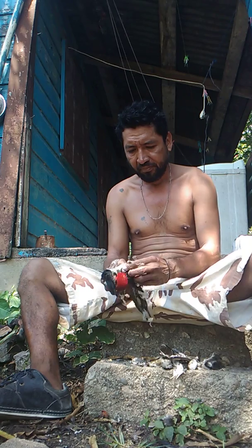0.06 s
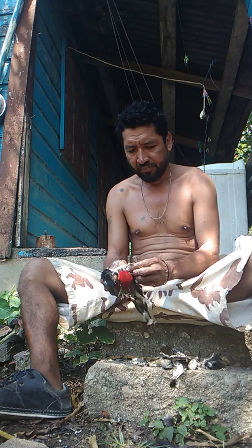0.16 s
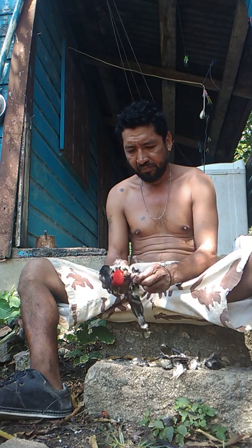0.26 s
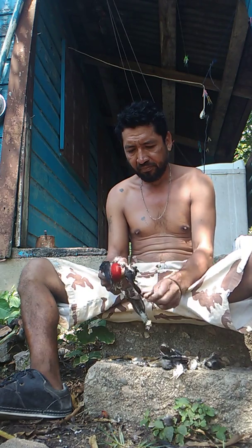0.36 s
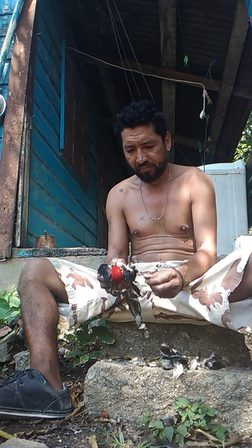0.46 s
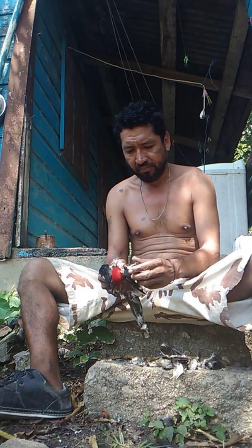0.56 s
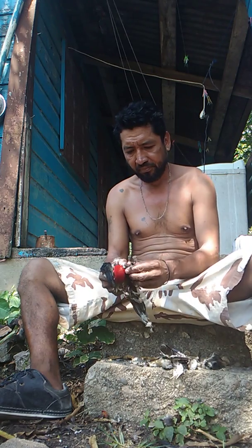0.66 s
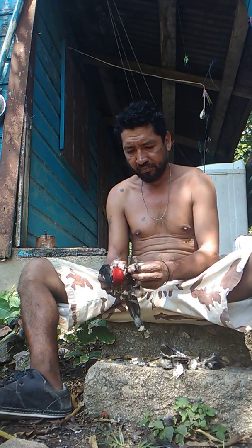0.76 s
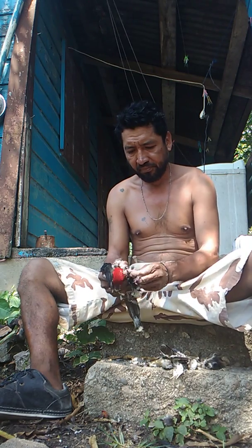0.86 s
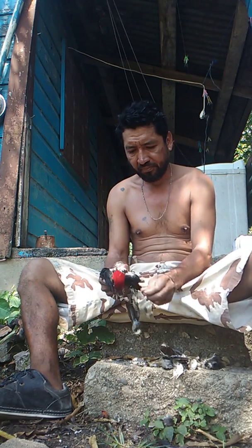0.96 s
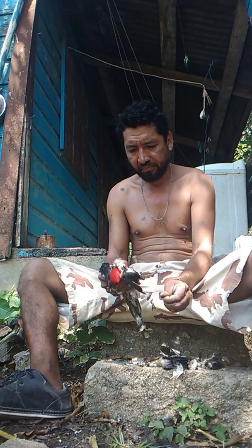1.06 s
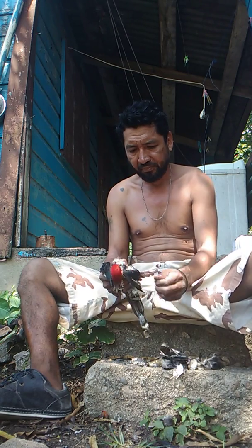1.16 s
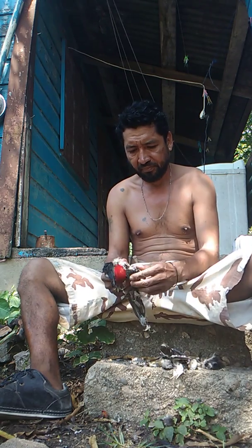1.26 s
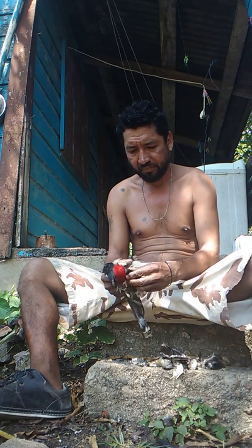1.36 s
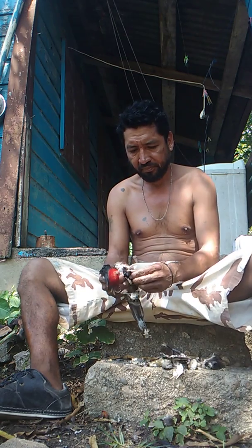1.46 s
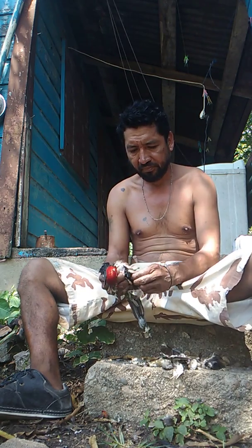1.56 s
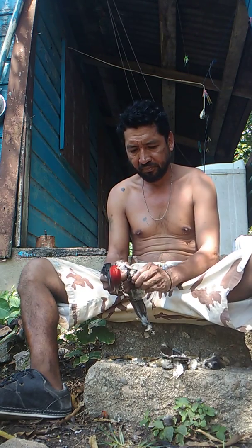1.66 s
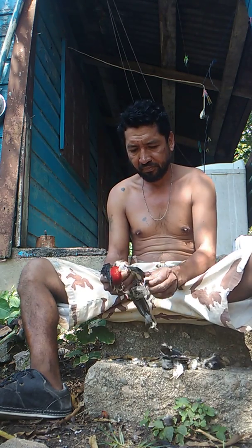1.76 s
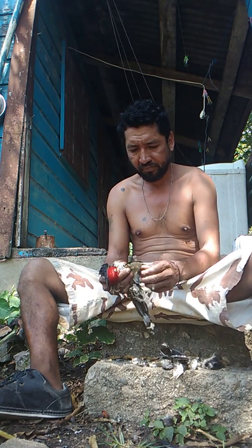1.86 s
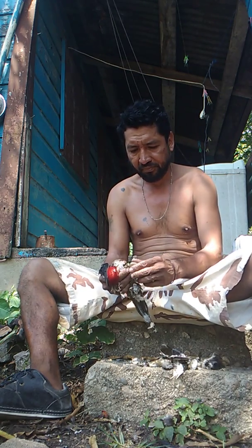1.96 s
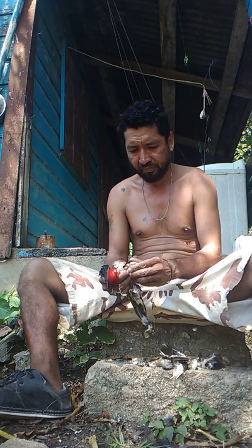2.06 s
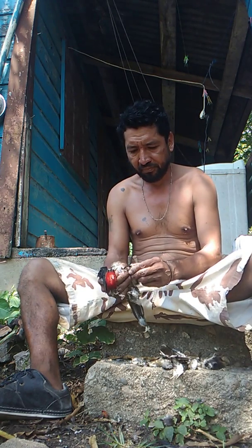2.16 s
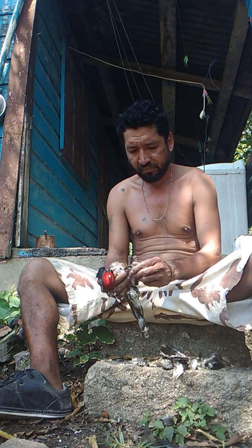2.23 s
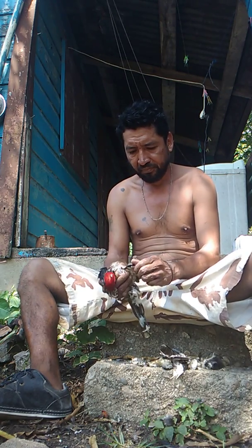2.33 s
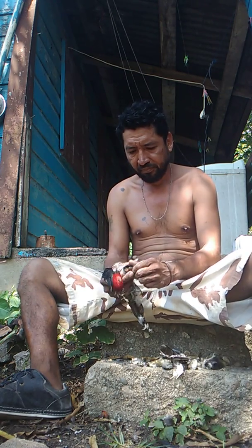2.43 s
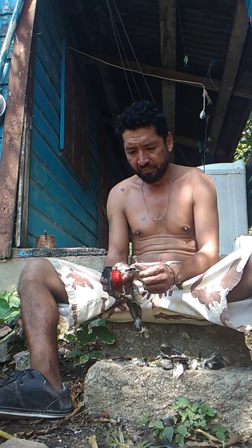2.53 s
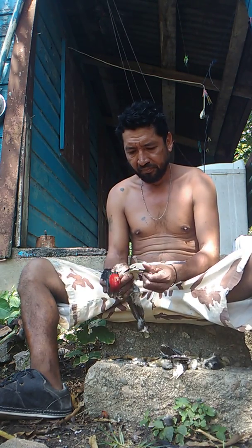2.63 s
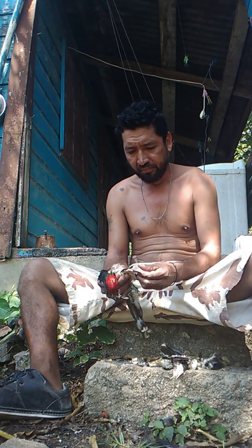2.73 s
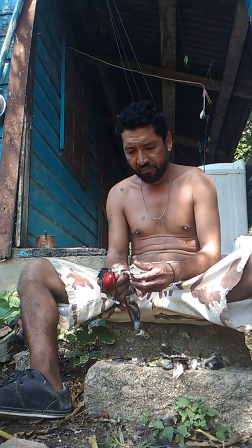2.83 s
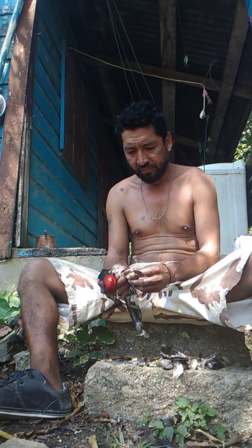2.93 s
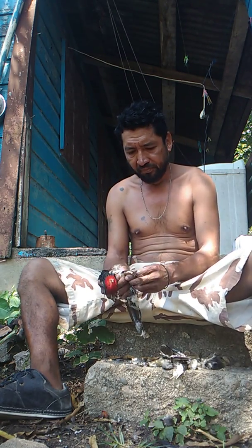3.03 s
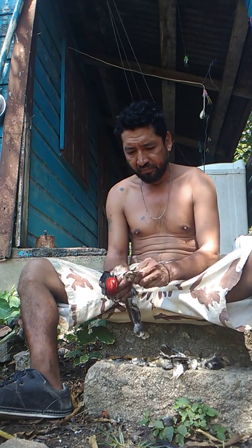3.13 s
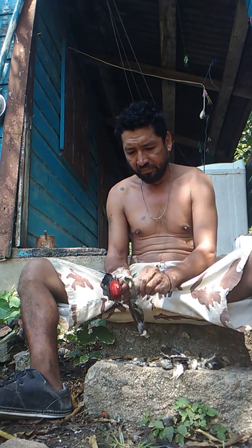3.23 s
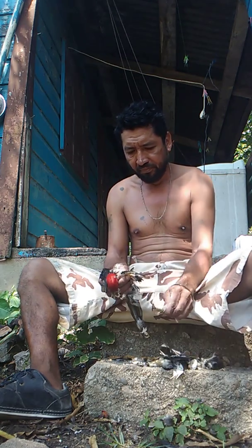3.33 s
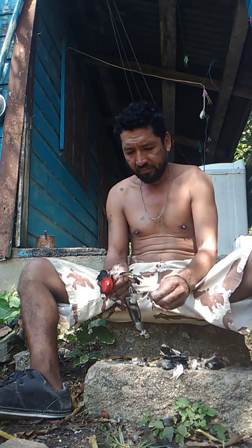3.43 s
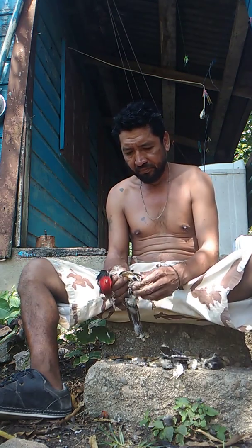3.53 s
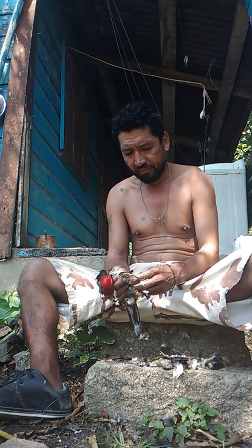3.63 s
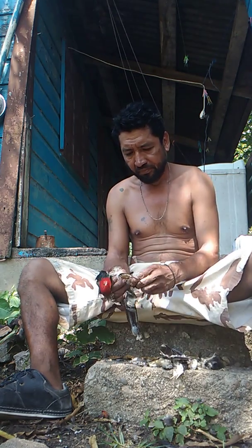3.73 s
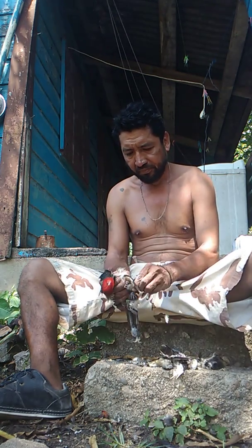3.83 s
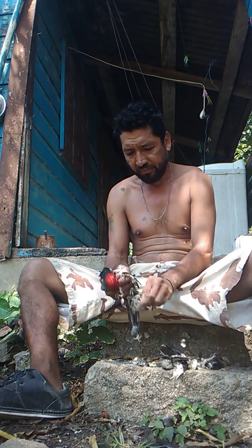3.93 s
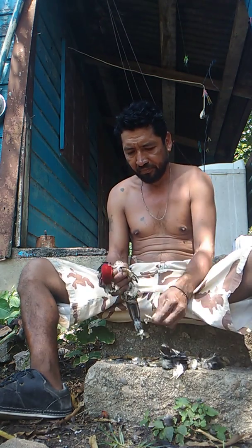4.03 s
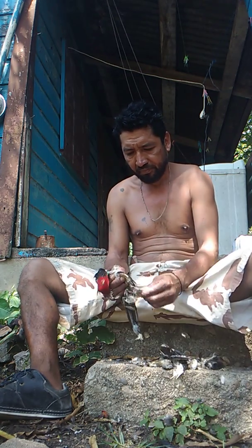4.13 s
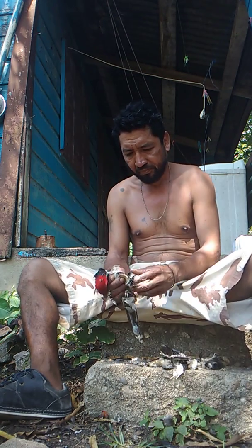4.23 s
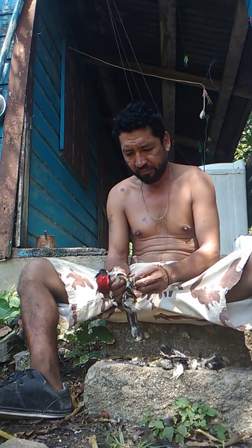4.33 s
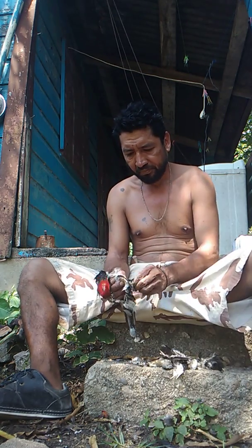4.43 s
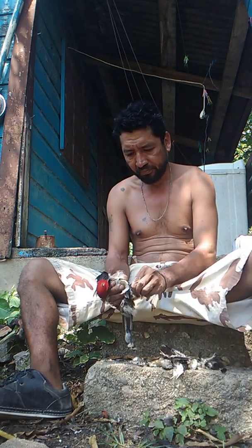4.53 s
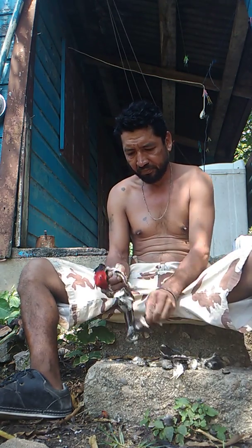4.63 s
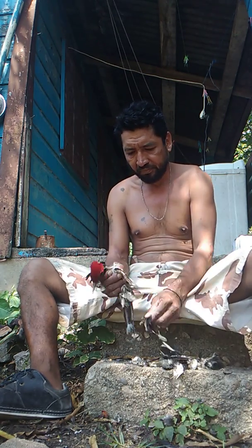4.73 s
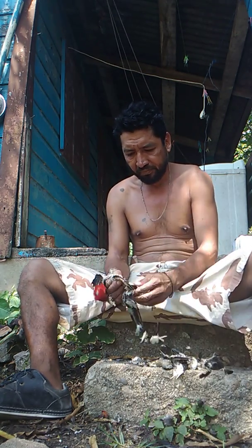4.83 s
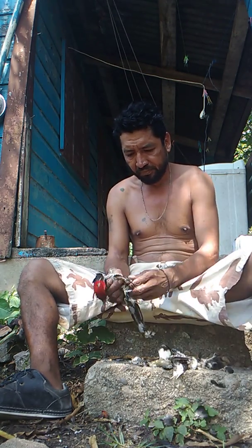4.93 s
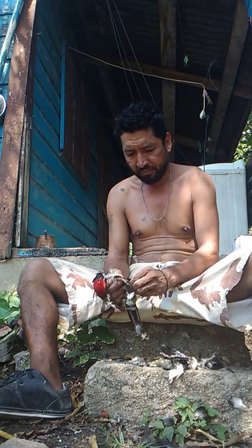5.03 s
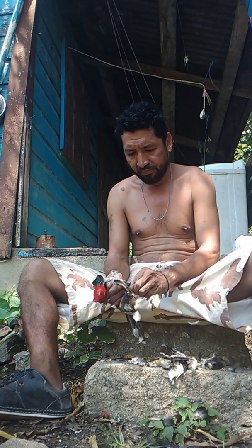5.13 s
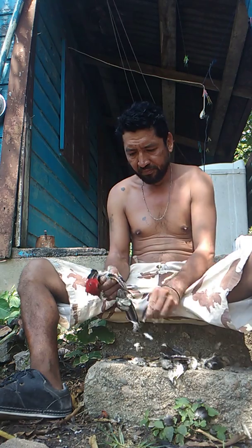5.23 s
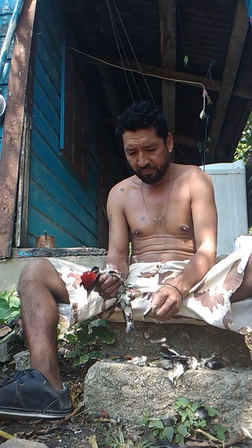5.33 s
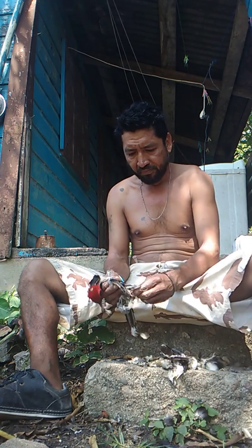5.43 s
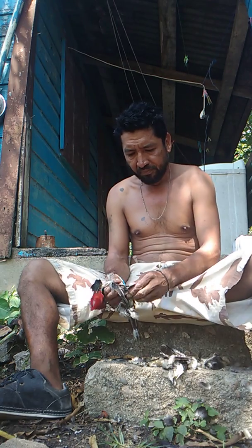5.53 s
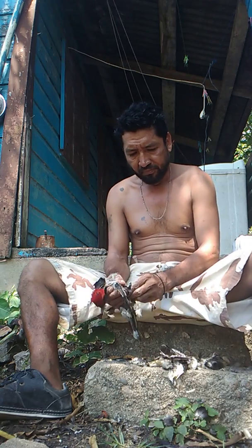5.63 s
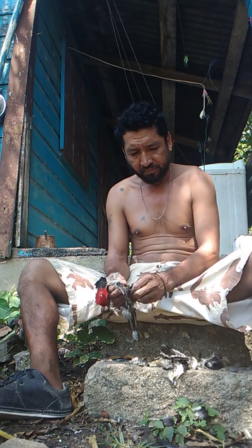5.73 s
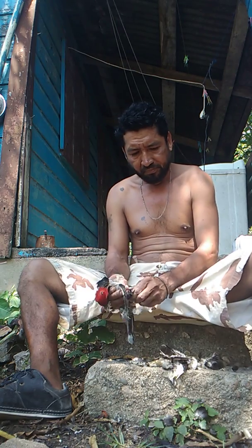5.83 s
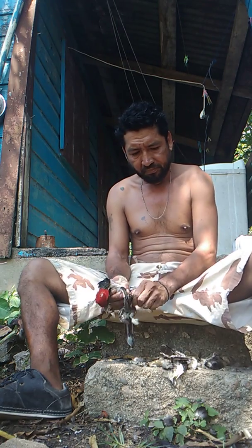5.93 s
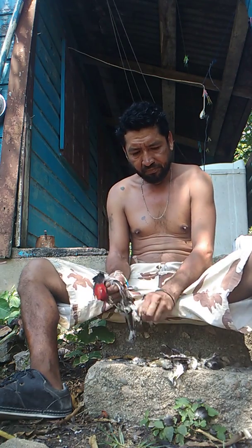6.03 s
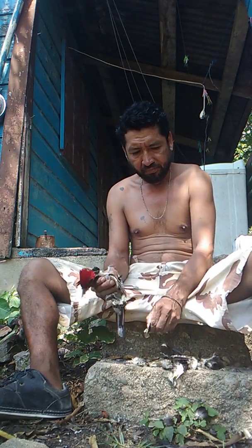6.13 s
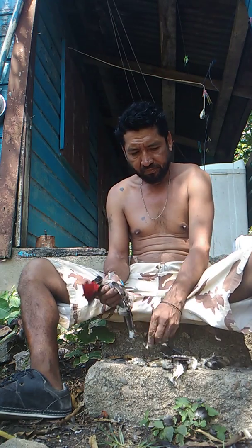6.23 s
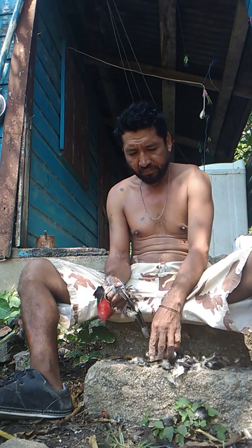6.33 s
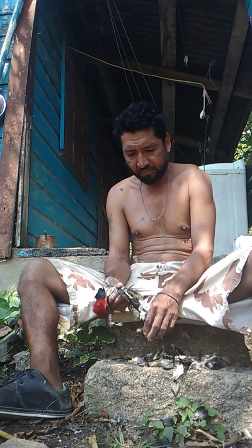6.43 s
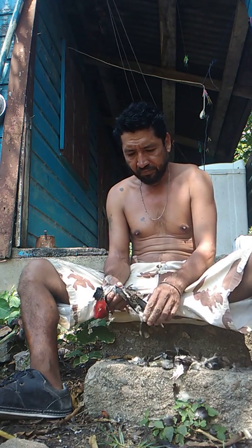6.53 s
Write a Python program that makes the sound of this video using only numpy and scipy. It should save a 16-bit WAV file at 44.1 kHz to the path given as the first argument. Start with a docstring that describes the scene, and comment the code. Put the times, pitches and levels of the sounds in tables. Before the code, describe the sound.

Dry feathers hiss under moving fingers, broken by tiny high ticks and irregular clusters of crisp quill snaps, each with a slight woody wing knock. A firm brush swells before three seconds; a small bump and thin creak precede one pull after four and a half. Outdoors under a porch roof, close stereo phone pickup, hands to the left, wind rumble to the right, quiet air and remote animal calls behind.

```python
"""Plucking a bird on a porch

Someone on a porch step plucks a dead bird by hand, close to a phone with a left and a right microphone port.
Quills tear out in bursts of tiny noise snaps that ring the wing and echo under the roof.
Streams of random slips make the rustle of fingers in the plumage; gliding tones make squeaks and a creak.
Behind are a scuff, a few distant animal calls, wind noise at each port, outdoor air and a far engine's hum."""
import sys
import numpy as np
from scipy import signal
from scipy.fft import rfft, irfft, next_fast_len
from scipy.io import wavfile
from scipy.ndimage import uniform_filter1d, map_coordinates

SR = 44100
rng = np.random.default_rng(int(sys.argv[2]) if len(sys.argv) > 2 else 0)


def log_audio(samples):
    """Write samples as a 16-bit WAV file to the path given in sys.argv[1]."""
    # one column per channel
    frames = np.atleast_2d(samples).T
    # limit to full scale, then quantise
    limited = np.clip(frames, -1, 1)
    pcm = np.round(limited * 32767).astype(np.int16)
    wavfile.write(sys.argv[1], SR, pcm)


N = 290218
T = np.arange(N) / SR  # s

# Levels in the tables are relative; the functions trim them. Spectra give a shape only.

# Quills snapping out of the skin. Each row: start in seconds, level in dB, wing knock in dB against that,
# left minus right in dB, brightness in dB per octave.
SNAPS = [(1.0108, -27, -17, 13, 0), (1.0123, -22, -15, 13, 2), (1.0143, -26, -22, 11, -2),
         (1.0241, -27, -18, 8, -14), (1.0345, -21, -18, 10, -4), (1.0358, -27, -15, 8, -3),
         (1.0378, -28, -15, 6, -5), (1.0423, -29, -22, 10, -6), (1.0489, -32, -12, 13, -9),
         (1.0652, -37, -22, 14, -3), (1.0872, -35, -24, 11, -9), (3.2716, -31, -16, 14, 3),
         (3.2795, -19, -16, 12, -7), (3.2816, -25, -18, 10, -4), (3.2865, -23, -19, 13, -4),
         (3.288, -19, -26, 16, 0), (3.2919, -25, -26, 17, 2), (3.3073, -25, -19, 8, 4),
         (3.3093, -18, -17, 11, -6), (3.3152, -31, -9, 7, 0), (3.3205, -30, -14, 10, 4),
         (3.3239, -22.5, -22, 8, 3), (3.3275, -27, -13, 8, -13), (3.9497, -29, -26, 20, 3),
         (3.9592, -30, -19, 22, 2), (3.9658, -28, -28, 17, 2), (3.9709, -30, -18, 12, 8),
         (3.9766, -10.5, -30, 15, 2), (3.9775, -16, -28, 15, 0), (3.9786, -19, -24, 14, 0),
         (3.9805, -20, -16, 12, 0), (3.9815, -18, -12, 11, 2), (3.9836, -23, -12, 12, -2),
         (4.6304, -22.5, -40, 24, 14), (4.6314, -28, -34, 22, 10), (4.6448, -30, -32, 26, 10),
         (4.6495, -26, -37, 14, 2), (4.6516, -27, -37, 10, -3), (4.6526, -28, -37, 9, -2),
         (4.6563, -32, -30, 10, 0), (5.239, -32, -36, 16, 9), (5.245, -16.3, -44, 15, 3.5),
         (5.2473, -27, -38, 6, 0), (5.2816, -39, -28, 10, -10), (6.0593, -22.5, -28, 14, 1),
         (6.0613, -25, -20, 15, -4), (6.0679, -28, -24, 19, 4), (6.1015, -37, -28, 10, -5),
         (6.3926, -36, -20, 7, 3), (6.3938, -30, -22, 11, 2), (6.3958, -35, -22, 9, -4)]
# Tugs in which small barbs and lesser quills tear. Each row: start in seconds, length in seconds, level in dB,
# wing knock in dB against that.
TUGS = [(1.01, .007, -39, -15), (1.024, .003, -40, -20), (1.035, .011, -34, -15), (1.047, .022, -44, -9),
        (3.271, .003, -42, -14), (3.2795, .012, -33.5, -11), (3.292, .014, -42, -8),
        (3.306, .005, -33, -13), (3.314, .014, -35, -12), (3.95, .024, -40, -15), (3.9768, .002, -25, -28),
        (3.98, .005, -32.5, -4), (3.987, .016, -42, -7), (4.628, .012, -43, -34), (4.65, .008, -37, -34),
        (5.232, .002, -49, -30), (5.2455, .002, -35, -34), (6.058, .014, -41, -15), (6.074, .035, -51, -11)]
# time for the crackle to rise by 20 dB before each burst, and to fall by 20 dB after it
CRACKLE_RISE_S, CRACKLE_FALL_S = .0055, .003
# Turns of the hands and their grip. Each row: time in seconds, send of the plucks to the porch walls in dB,
# stretch of the wing's modes as a ratio, tilt of those modes in dB per octave.
HANDS = [(1.04, -5, .93, 3), (3.3, -7.5, 1.01, -1), (3.97, -12.5, 1.09, -3), (4.64, -7, 1.0, 2),
         (5.25, -8.5, 1.03, 1), (6.06, -3.5, 1.0, 1)]
# Modes of the wing and its shafts. Each row: pitch in Hz before the grip stretches it,
# time to fade by 60 dB in seconds, level in dB.
WING_MODES = [(513, .02, -24), (1230, 0.028, -9), (2000, 0.012, -.5), (3400, 0.005, 3.5), (4500, 0.004, 1),
              (5700, .0026, 0)]
# Spectrum of a quill's crack. Each row: frequency in Hz, density in dB per Hz.
CRACK_TONE = [(1500, -42), (4000, -27), (5800, -20), (7700, -4.5), (9500, 1), (10800, -6), (11600, -5.5),
              (12800, -12), (14000, -12), (15000, -31)]
# Treble that the porch throws back. Each row: frequency in Hz, gain in dB.
PORCH_TONE = [(1200, -3), (2000, -5), (3300, -6), (5000, -.5), (7000, 0)]

# Single feathers springing past the fingertips. Each row: start in seconds, level in dB,
# splintering time in seconds, left minus right in dB, brightness in dB per octave.
FLICK_TICKS = [(0.1075, -39, .0005, 10, 0), (0.1752, -33, .0015, 12, 0), (0.3704, -32.5, .0009, 11, -8),
               (0.3802, -32, .0015, 11, -8), (0.4226, -20.5, .0005, 10, 5), (0.7158, -41, .0005, 9, 0),
               (0.7434, -31.5, .0003, 23, 9), (0.7502, -38, .0006, 20, 6), (0.7545, -36, .0007, 20, 6),
               (0.8257, -47, .0005, 15, 4), (0.9038, -46, .0005, 15, 6), (1.1911, -37, .0008, 23, 8),
               (1.199, -41, .0006, 20, 8), (1.3742, -39, .002, 12, 0), (1.3838, -34, .001, 14, 3),
               (1.5455, -39, .0006, 15, 0), (1.5537, -37, .0006, 15, 0), (1.5703, -40, .0005, 15, 3),
               (1.6218, -32, .001, 17, -8), (1.7584, -39, .0006, 15, -4), (1.7647, -37, .001, 15, -6),
               (1.8074, -48, .0006, 15, 0), (1.8994, -48, .001, 17, 8), (2.7083, -25, .0009, 8, 0),
               (2.7122, -25, .001, 8, 0), (2.8604, -39, .0005, 8, 0), (3.1127, -45, .003, 18, -8),
               (3.2324, -39, .0006, 20, 12), (5.1356, -46, .0006, 7, 0), (6.3299, -49, .0008, 13, 0),
               (6.3684, -31, .0007, 11, -3)]
# Feathers brushing back into place. Each row: peak in seconds, barb hiss in dB, vane scrape in dB,
# left minus right in dB.
FLICK_BRUSHES = [(0.174, -53, -60, 12), (0.372, -53, -62, 11), (0.383, -55, -64, 11),
                 (0.4223, -57, -76, 10), (0.748, -54, -72, 23), (0.901, -68, -80, 15),
                 (1.1902, -56, -86, 23), (1.377, -51, -78, 12), (1.3838, -60, -80, 14),
                 (1.5535, -60, -75, 15), (1.6215, -55, -66, 17), (1.761, -51, -59, 15),
                 (1.891, -59, -79, 17), (3.114, -62, -62, 18), (3.2317, -65, -75, 20),
                 (4.162, -68, -75, 11), (5.1342, -73, -72, 7), (6.3678, -58, -66, 11)]
FLICK_RISE_S, FLICK_FADE_S = .008, .09  # time for a brush to swell and to fade by 20 dB

# The hand bumps the bird as it takes a new grip. Each row: frequency in Hz, density in dB per Hz.
BUMP_TONE = [(400, -22), (800, -10), (1100, 3), (1350, -7), (1700, 6), (2300, -13), (3600, -20), (4150, -3),
             (4500, 7), (5000, -14), (7000, -22), (8400, -6), (8810, 17), (9300, -1), (10300, -8),
             (11200, 1), (14000, -14)]
BUMP_S = 4.588

# Strokes through the plumage. Each row: firmest moment in seconds, rise by 20 dB in seconds,
# fade by 20 dB in seconds, barb hiss in dB, vane scrape in dB, left minus right in dB.
STROKES = [(0.056, .07, .15, -47, -54.5, 9), (0.21, .12, .27, -56, -59.5, 13),
           (0.715, .1, .07, -57, -67, 9), (0.765, .06, .14, -55, -65, 23), (0.98, .08, .08, -66, -72, 12),
           (1.475, .1, .12, -52, -85, 20), (1.55, .15, .25, -53, -66, 15), (1.70, .1, .12, -61, -82, 16),
           (2.29, .06, .07, -68, -80, 22), (2.57, .08, .1, -65, -75, 10), (2.712, .085, .17, -38, -66, 8),
           (2.79, .08, .2, -45, -65, 3), (2.96, .15, .16, -56, -70, 17), (3.51, .05, .25, -71, -80, 5),
           (3.855, .03, .05, -73, -75, 5), (4.16, .04, .1, -62, -71, 11), (4.245, .07, .1, -54, -52, 8),
           (4.285, .05, .08, -57, -59, 6), (4.48, .1, .14, -61, -68, 8), (4.58, .05, .06, -65, -82, 19),
           (4.86, .06, .15, -70, -84, 7), (5.73, .04, .08, -75, -86, 5), (5.86, .04, .06, -70, -90, 7),
           (5.96, .06, .07, -64, -76, 12), (6.054, .015, .02, -52, -62, 12), (6.11, .05, .13, -51, -53, 12),
           (6.175, .06, .08, -56, -64, 19), (6.33, .02, .15, -63, -74, 13), (6.365, .05, .04, -58, -66, 11),
           (6.40, .02, .12, -54, -57, 6), (6.47, .06, .1, -53, -59, 10), (6.52, .08, .13, -50, -56, 13)]
# Spectrum of the fine barbs' hiss. Each row: frequency in Hz, density in dB per Hz.
BARB_TONE = [(1500, -66), (4000, -38), (7000, -26), (8700, -5), (9500, 3.5), (10100, 5), (10900, 0),
             (12500, -5.5), (14100, -8.5), (14600, -34)]
# Spectrum of the vanes' scrape. Each row: frequency in Hz, density in dB per Hz.
VANE_TONE = [(1200, -56), (2500, -28), (4300, -16), (6000, -11), (7500, 2), (8600, 4), (10000, -4.5),
             (14000, -32)]
# Narrow hiss of the shaft under a firm stroke, before it glides. Each row: frequency in Hz, density in dB per Hz.
SHAFT_TONE = [(1500, -76), (5000, -41), (7000, -23.5), (8400, -13), (8900, -13), (9450, 3.5), (10050, -1),
              (10800, -13.5), (12500, -23), (14200, -31)]
SHAFT_HZ = 9700  # nominal middle of that band
# The band moves with the length of shaft left free. Each row: time in seconds, middle of the band in Hz.
SHAFT_PITCH = [(0, 9550), (1.5, 9900), (2.73, 10000), (2.8, 9450), (2.95, 9850), (4.2, 9700), (6.1, 9000),
               (6.4, 9700)]
# The bird shifting in the hand that holds it: hiss, scrape, left minus right, spread of the level's wander
HOLD_BARB_DB, HOLD_VANE_DB, HOLD_PAN_DB, HOLD_WANDER_DB = -85, -85, 6, 3
# Tone of the right port, which faces away from the hands. Each row: frequency in Hz, gain in dB.
SHADE = [(500, 10), (3000, 0.5), (6500, 8), (9000, 1.5), (11000, -12), (13000, -11)]

# Feather shafts squeaking thinly between the fingers. Each row: start in seconds, length in seconds,
# start pitch in Hz, end pitch in Hz, level in dB.
SQUEAKS = [(0.2, .17, 6950, 6400, -61), (0.54, .1, 11300, 11200, -66), (1.727, .016, 7250, 7150, -60),
           (1.752, .016, 7150, 7250, -57), (2.05, .08, 11700, 11900, -72), (2.24, .09, 9600, 10100, -66),
           (2.39, .11, 10200, 9300, -67), (3.108, .022, 6500, 6700, -59), (3.54, .29, 12300, 11950, -63)]
# A shaft creaks in the new grip, into the moment the quills give
CREAK_S, CREAK_LENGTH_S, CREAK_HZ = 4.579, .068, 4430

# A scuff off to the right. Each row: time in seconds, level in dB.
SCUFF = [(4.372, -81), (4.380, -54.5), (4.392, -61), (4.405, -57), (4.43, -69), (4.50, -77), (4.52, -100)]
# Resonances of the scuff. Each row: frequency in Hz, density in dB per Hz.
SCUFF_TONE = [(3500, -29), (4700, -13), (5300, 2), (5900, -14), (6500, -9), (7200, -13), (8000, 3.5),
              (8800, -8), (13000, -28)]

# Far birds and yard animals. Each row: start in seconds, length in seconds, start pitch in Hz before the arch,
# end pitch in Hz before the arch, level in dB, octave in dB against that, pitch roughness as a share.
CALLS = [(0.612, 0.045, 3170, 3060, -66.5, -30, .012), (0.665, .04, 2950, 2850, -77, -30, .03),
         (0.655, 0.03, 2480, 2420, -77, -30, .03), (0.84, .04, 2780, 2770, -79, -30, .03),
         (1.1, 0.028, 560, 565, -56, -24, .01), (1.125, .05, 570, 550, -61, -22, .014),
         (1.198, .025, 1300, 1330, -73, -30, .03), (1.205, 0.085, 1110, 1090, -71, -30, .04),
         (2.32, 0.051, 3450, 3480, -68, -30, .014), (2.85, 0.04, 680, 700, -64, -9, .02),
         (3.45, 0.1, 1100, 1094, -70, -30, .05), (5.89, 0.065, 1060, 1065, -67.5, -5, .018),
         (5.94, 0.08, 1085, 1060, -59.5, -21, .02), (6.015, .075, 1075, 1060, -64.5, -24, .02),
         (6.366, 0.035, 670, 705, -62, -22.5, .014)]
CALL_ARCH = .025  # share by which the pitch bows over a call, up in the middle and down at the ends

# The breeze at each port. Each row: time in seconds, left level in dB, right level in dB.
BREEZE = [(0, -73, -54), (0.2, -60, -52), (0.5, -65, -57), (0.9, -75, -69), (1.1, -65, -70),
          (1.3, -68, -78), (1.55, -62, -61), (1.9, -71, -57), (2.6, -65, -55), (3.1, -65, -57),
          (3.37, -66, -54), (3.5, -67, -69), (3.76, -63, -73), (3.81, -64, -56), (4.3, -66, -63),
          (4.65, -78, -58), (4.99, -66, -74), (5.04, -64, -53), (6.58, -65, -55.5)]
# Gusts that strike the right port. Each row: peak in seconds, length in seconds, level in dB.
GUSTS = [(0.025, .04, -44), (0.185, .05, -42), (0.315, .08, -43), (0.42, .06, -40), (0.81, .07, -57),
         (1.69, .08, -38), (2.04, .045, -40), (2.115, .03, -30), (2.26, .05, -49), (2.425, .06, -42),
         (2.64, .04, -40), (2.73, .06, -33), (2.86, .22, -44), (3.185, .03, -46), (3.915, .05, -45),
         (4.135, .07, -52), (4.405, .04, -49), (4.565, .04, -45), (4.742, .04, -45), (5.1, .05, -39),
         (5.615, .03, -45), (6.44, .1, -52)]
GUST_RISE = .4  # share of a gust's length spent rising
# Spectrum of wind on a port. Each row: frequency in Hz, density in dB per Hz.
BUFFET_TONE = [(20, -24), (38, -21.5), (58, -.5), (85, 0), (125, -7), (165, -11), (220, -29), (350, -35.5),
               (900, -65)]
# Spectrum of the outdoor air. Each row: frequency in Hz, density in dB per Hz.
AIR_TONE = [(110, -24), (180, -8.5), (319, -13.5), (399, -10), (682, -13), (748, -12.5), (1210, -19),
            (1960, -21), (3110, -24.5), (10200, -32.5), (11200, -32.5), (13700, -38), (15000, -51)]
AIR_DB = -70
# The far engine's hum. Each row: time in seconds, level in dB.
ENGINE = [(0, -79.5), (3.3, -68), (3.8, -68.5), (4.7, -77.5), (5.6, -66), (6.1, -59), (6.58, -69)]
ENGINE_HZ = 127.2  # middle of its wandering pitch
TOP_HZ = 14350  # where the phone's treble ends


def snaps(crack_db=-19.9, knock_db=-18):
    """Each quill lets go with a crack of its own brightness and jolts the wing."""
    out = np.zeros((2, N))
    for s, db, low_db, pan_db, tilt_db in SNAPS:
        push = fracture(splinter=.14, splinter_s=.0009)
        crack = colour(push, tilted(CRACK_TONE, tilt_db))
        knock = wing(push, s, detune=1 + .035 * rng.standard_normal())
        sound = undb(crack_db) * unit(crack) + undb(knock_db + low_db) * unit(knock)
        add(out, s, sound * undb([[db], [db - pan_db]]))
    return out


def fracture(splinter, splinter_s):
    """One sharp break followed by a decaying burst of splintering."""
    t = T[:SR // 25]
    push = splinter * rng.standard_normal((2, len(t))) * np.exp(-t / splinter_s)
    push[0, 0] += 1
    push[1, 2] += 1  # the right port hears it just after the left
    return push


def wing(x, s, detune=1):
    """The wing rings briefly with whatever jolts it; the grip at time s stretches and tilts its modes."""
    t = T[:SR // 20]
    when, _, stretches, tilts = np.transpose(HANDS)
    stretch = detune * np.interp(s, when, stretches)
    tilt_db = np.interp(s, when, tilts)
    ring = np.zeros(len(t))
    for hz, t60, db in WING_MODES:
        fade = undb(db + tilt_db * np.log2(hz) - 60 * t / t60)
        ring += fade * np.sin(2 * np.pi * hz * stretch * t)
    kick = np.diff(ring, prepend=0)[None]
    return signal.fftconvolve(x, kick, axes=1)[:, :x.shape[-1]]


def tearing(right_db=-10, tear_db=-1):
    """Small barbs crackle apart at random in a burst for each tug, rising before it and falling after."""
    out, t = np.zeros((2, N)), T[:SR // 10]
    lead_s = 2 * CRACKLE_RISE_S
    for start, length, db, low_db in TUGS:
        age = t - lead_s
        outside = np.maximum(-age / CRACKLE_RISE_S, (age - length) / CRACKLE_FALL_S)
        strength = undb(db + tear_db - 20 * np.clip(outside, 0, 10))
        slips = (rng.random(len(t)) < 4000 / SR) * rng.standard_normal((2, len(t)))  # 4000 a second
        crackle = colour(slips * strength, CRACK_TONE) / np.std(colour(slips, CRACK_TONE))
        knock = wing(slips * strength, start) / np.std(wing(slips, start))
        add(out, start - lead_s, crackle + undb(low_db) * knock)
    return out * undb([[0], [right_db]])


def flicks(flick_db=-28):
    """Single feathers spring free with a short, high tick."""
    out = np.zeros((2, N))
    for s, db, splinter_s, pan_db, tilt_db in FLICK_TICKS:
        push = fracture(splinter=.3, splinter_s=splinter_s)
        tick = unit(colour(push, tilted(BARB_TONE, tilt_db)))
        add(out, s, tick * ports(pan_db)[:, None] * undb(db + flick_db))
    return out


def bump(bump_db=-32, decay_s=0.0035, right_db=-10):
    """Fingers knock on the bird's body: a short noise burst through its resonances."""
    age = np.maximum(T - BUMP_S, 0)
    contact = np.minimum(age / .002, 1) * np.exp(-age / decay_s)
    knock = colour(contact * rng.standard_normal((2, N)), BUMP_TONE)
    return knock / np.max(np.abs(knock)) * undb(bump_db) * undb([[0], [right_db]])


def rustle(barb_db=-2.7, shaft_db=-7.5, vane_db=-3.5, hook_db=-12, grip_db=1.1, usual_db=-50):
    """Fingers slide over barbs and vanes, hooks unzip in dry ticks; firm strokes favour the shaft."""
    barbs = plumage(BARB_TONE, rate=5000, spread_db=3)
    shaft = plumage(SHAFT_TONE, rate=7000, spread_db=2.5)
    shaft = glide(shaft, curves(SHAFT_PITCH)[0] - SHAFT_HZ)
    vanes = plumage(VANE_TONE, rate=5000, spread_db=2.5)
    hooks = unit(colour(grains(rate=220, spread_db=1), BARB_TONE))
    fine, coarse = touches()
    # above the usual strength, the barbs give way and the shaft comes up
    firm_db = .4 * np.maximum(20 * np.log10(np.hypot(*fine)) - usual_db, 0)
    soft_hiss = (barbs * undb(barb_db) + hooks * undb(hook_db)) * undb(-firm_db)
    hiss = soft_hiss + shaft * undb(shaft_db + firm_db)
    scrape = vanes * undb(vane_db)
    return (fine * hiss + coarse * scrape) * undb(grip_db * walk(70))


def plumage(tone, rate, spread_db):
    """A dense random stream of slips, with the levels of narrow bands varied at random."""
    slips = colour(grains(rate, spread_db), tone)
    return steady(shifting(slips, depth_db=5.8, width_hz=170, hold_s=.06), size_s=.025)


def grains(rate, spread_db):
    """Tiny slips of uneven size, rate a second; each meets the two ports differently."""
    size = (rng.random(N) < rate / SR) * undb(spread_db * np.minimum(rng.exponential(size=N), 4))
    return size * rng.standard_normal((2, N))


def touches():
    """Strength of barb hiss and vane scrape at each port: strokes, flicked feathers and the holding hand."""
    brushes = [(s, FLICK_RISE_S, FLICK_FADE_S, *rest) for s, *rest in FLICK_BRUSHES]
    hold = (ports(HOLD_PAN_DB)[:, None] * undb(HOLD_WANDER_DB * walk(12))) ** 2
    fine, coarse = hold * undb(HOLD_BARB_DB) ** 2, hold * undb(HOLD_VANE_DB) ** 2
    for s, rise_s, fade_s, fine_db, coarse_db, pan_db in STROKES + brushes:
        power = ports(pan_db)[:, None] ** 2 * touch_power(s, rise_s, fade_s)
        fine += power * undb(fine_db) ** 2
        coarse += power * undb(coarse_db) ** 2
    return np.sqrt(fine), np.sqrt(coarse)


def touch_power(s, rise_s, fade_s):
    """Power of a touch that peaks at time s and is 20 dB weaker rise_s before and fade_s after."""
    away = np.maximum((s - T) / rise_s, (T - s) / fade_s)
    return undb(-20 * np.minimum(away, 10)) ** 2


def squeak(waver_hz=170, right_db=-12, squeak_db=-2):
    """A smooth shaft slips through the fingers with a gliding, unsteady whistle."""
    out, waver = np.zeros((1, N)), waver_hz * walk(1200)
    grip = undb(squeak_db + 3.8 * walk(300))
    for s, length, hz0, hz1, db in SQUEAKS:
        u = np.linspace(0, 1, int(length * SR))
        hz = hz0 + (hz1 - hz0) * u + waver[int(s * SR):][:len(u)]
        add(out, s, undb(db) * np.sin(np.pi * u) * np.sin(2 * np.pi * np.cumsum(hz) / SR))
    return out * grip * undb([[0], [right_db]])


def creak(creak_db=-65, octave_db=7, waver_hz=130, right_db=-8):
    """A gripped shaft sticks and slips with a thin, rough tone and its octave."""
    u = np.clip((T - CREAK_S) / CREAK_LENGTH_S, 0, 1)
    phase = 2 * np.pi * np.cumsum(CREAK_HZ + waver_hz * walk(1200)) / SR
    grip = np.sqrt(np.abs(np.sin(np.pi * u))) * undb(creak_db + 4 * walk(400))
    tone = np.sin(phase) + undb(octave_db) * np.sin(2 * phase)
    return grip * tone * undb([[0], [right_db]])


def scuff(pan_db=-6):
    """Something dry scrapes briefly on the step: resonant grit."""
    sounding = (T > SCUFF[0][0]) & (T < SCUFF[-1][0])
    grit = unit(colour(grains(rate=6400, spread_db=1), SCUFF_TONE))
    return grit * sounding * undb(curves(SCUFF)[0]) * ports(pan_db)[:, None]


def animals(call_db=1.0, direct=0.95, flutter_db=2):
    """Short calls arch in pitch and flutter in strength, blurred by diffuse echoes of the distance."""
    out, waver, flutter = np.zeros((1, N)), walk(300), undb(flutter_db * walk(90))
    for s, length, hz0, hz1, db, octave_db, rough in CALLS:
        u = np.linspace(0, 1, int(length * SR))
        arch = 1 + CALL_ARCH * (np.sin(np.pi * u) - 2 / np.pi)
        roughness = 1 + rough * waver[int(s * SR):][:len(u)]
        hz = (hz0 + (hz1 - hz0) * u) * arch * roughness
        phase = 2 * np.pi * np.cumsum(hz) / SR
        strength = undb(db + call_db) * np.sqrt(np.abs(np.sin(np.pi * u)))
        add(out, s, strength * (np.sin(phase) + undb(octave_db) * np.sin(2 * phase)))
    out = out * flutter
    return direct * out + echo(out[0], t60=0.26, build_s=0.0035, damp_s=0.093)


def wind(left_db=-36, flutter_db=2.4):
    """Eddies thump on each port separately; a fluttering breeze and short gusts set their strength."""
    breeze = undb(np.array(curves(BREEZE)) + flutter_db * np.array([walk(16), walk(16)]))
    gust_power = np.zeros(N)
    for s, length, db in GUSTS:
        age = (T - s) / (length * np.where(T < s, GUST_RISE, 1 - GUST_RISE))
        gust_power += undb(db) ** 2 * np.exp(-np.minimum(age ** 2, 20))
    gusts = np.sqrt(gust_power) * undb([[left_db], [0]])
    eddies = steady(colour(rng.standard_normal((2, N)), BUFFET_TONE), size_s=0.038)
    return eddies * np.hypot(breeze, gusts)


def outdoors(apart_hz=1900, left_db=0.28):
    """Restless open air, alike at both ports in the bass, and the wavering hum of a far engine."""
    mid, side = colour(rng.standard_normal((2, N)), AIR_TONE)
    side = colour(side, [(300, -13), (650, -12), (apart_hz, -1), (8000, 0)])
    air = (mid + side * np.array([[1], [-1]])) / np.std(mid)
    air = air * undb(AIR_DB) * undb([[left_db], [-left_db]])
    low = signal.sosfiltfilt(signal.butter(2, 1500, fs=SR, output="sos"), air)
    restless_low = shifting(low, depth_db=3.5, width_hz=130, hold_s=.06)
    engine_hz = ENGINE_HZ + 1.42 * walk(6.2)
    hum = np.sin(2 * np.pi * np.cumsum(engine_hz) / SR) * undb(curves(ENGINE)[0] + 2 * walk(6.8))
    return air - low + restless_low + hum


def echo(x, t60, build_s, damp_s):
    """Diffuse reflections build up, then die away, the treble first."""
    t = T[:int(.6 * SR)]
    scatter = rng.standard_normal((2, len(t)))
    dull = uniform_filter1d(scatter, size=4)
    response = dull + (scatter - dull) * np.exp(-t / damp_s)
    response = response * np.exp(-np.log(1000) * t / t60) * (1 - np.exp(-t / build_s))
    response /= np.sqrt(np.sum(response ** 2, axis=1, keepdims=True))
    return signal.fftconvolve(x[None], response, axes=1)[:, :N]


def shifting(x, depth_db, width_hz, hold_s):
    """The levels of narrow bands vary at random, smoothly over width_hz and hold_s."""
    _, _, bands = signal.stft(x, nperseg=512)
    k, m = bands.shape[-2:]
    across = np.arange(k) * SR / 512 / width_hz
    along = np.arange(m) * 256 / SR / hold_s
    grid = np.meshgrid(across, along, indexing="ij")
    swell = map_coordinates(rng.standard_normal((k, m)), grid, order=1, mode="mirror")
    return signal.istft(bands * unit(undb(depth_db * unit(swell))))[1][..., :N]


def glide(x, shift_hz):
    """Move a sound up or down by a changing number of Hz."""
    analytic = signal.hilbert(x, next_fast_len(N))[..., :N]
    return np.real(analytic * np.exp(2j * np.pi * np.cumsum(shift_hz) / SR))


def colour(x, points):
    """Causal minimum-phase filter with the given (Hz, dB) outline."""
    n = x.shape[-1]
    hz, db = np.transpose(points)
    size = 2 * next_fast_len(n // 2 + 512)
    f = np.maximum(np.fft.rfftfreq(size, 1 / SR), 1)
    cepstrum = irfft(np.log(undb(np.interp(np.log(f), np.log(hz), db))))
    cepstrum[1:size // 2] *= 2  # fold the cepstrum forward in time
    cepstrum[size // 2 + 1:] = 0
    return irfft(rfft(x, size) * np.exp(rfft(cepstrum)))[..., :n]


def tilted(tone, tilt_db, pivot_hz=9500):
    """The same spectrum, tilted by tilt_db per octave down to an octave below the pivot."""
    return [(f, d + tilt_db * np.log2(max(f / pivot_hz, .5))) for f, d in tone]


def steady(x, size_s):
    """Even out the level smoothly over the given time, to about rms 1."""
    k = int(size_s * SR)
    power = uniform_filter1d(uniform_filter1d(x ** 2, k), k)
    return x / np.sqrt(np.abs(power) + 1e-12)


def walk(rate):
    """Smooth random wander of rms 1, with rate new values a second."""
    k = max(int(SR / rate), 2)
    steps = np.repeat(rng.standard_normal(N // k + 1), k)
    return unit(uniform_filter1d(uniform_filter1d(steps, k), k)[:N])


def ports(pan_db):
    """Left and right gains that give unrelated signals a mean of rms 1."""
    gains = undb(np.array([pan_db, -pan_db]) / 2)
    return 2 * gains / np.sqrt(np.sum(gains ** 2, axis=0))


def curves(rows):
    """Each column of a table, joined by straight lines in time."""
    s, *columns = np.transpose(rows)
    return [np.interp(T, s, c) for c in columns]


def add(out, s, x):
    """Mix x into out from time s."""
    i = max(int(s * SR), 0)
    out[:, i:i + x.shape[-1]] += x[..., :N - i]


def unit(x):
    """Scale to rms 1."""
    return x / np.sqrt(np.mean(x ** 2) + 1e-30)


def undb(db):
    """Decibels to gain."""
    return 10 ** (np.asarray(db) / 20)


def scene():
    """The hands' sounds with their echo under the porch roof, in the open air."""
    plucks = snaps() + tearing() + flicks() + bump()
    porch_send = plucks[0] * undb(curves(HANDS)[0])
    porch = echo(porch_send, t60=0.3, build_s=0.017, damp_s=.4) * undb([[0], [-8]])
    porch = shifting(colour(porch, PORCH_TONE), depth_db=3.4, width_hz=220, hold_s=.05)
    left, right = plucks + porch + rustle()
    hands = np.array([left, colour(right, SHADE)]) + squeak() + creak()
    return hands + scuff() + animals() + wind() + outdoors()


def record(dry):
    """The phone cuts the top with a steep low-pass."""
    return signal.sosfilt(signal.ellip(8, .2, 70, TOP_HZ, fs=SR, output="sos"), dry)


dry = scene()
out = record(dry)
log_audio(out)
```